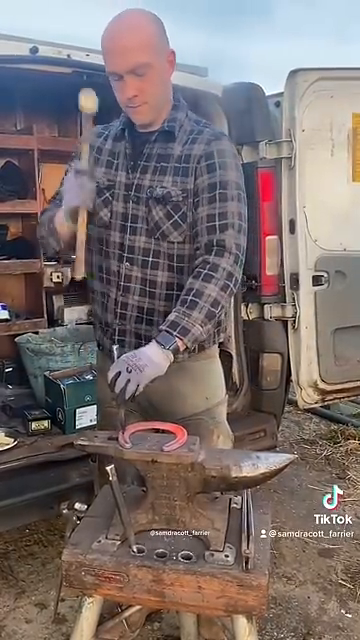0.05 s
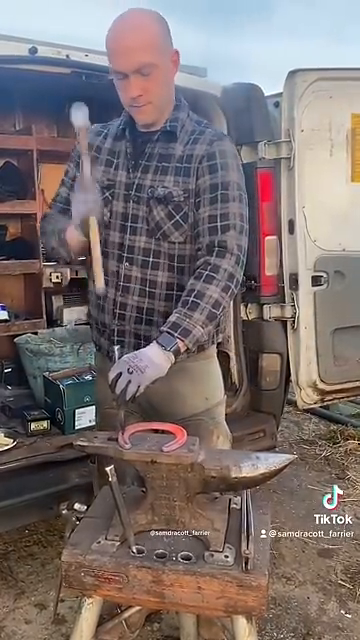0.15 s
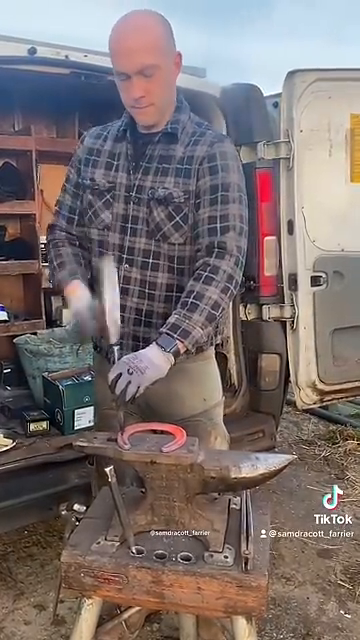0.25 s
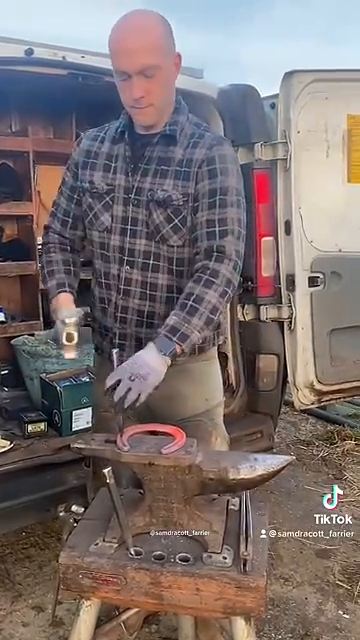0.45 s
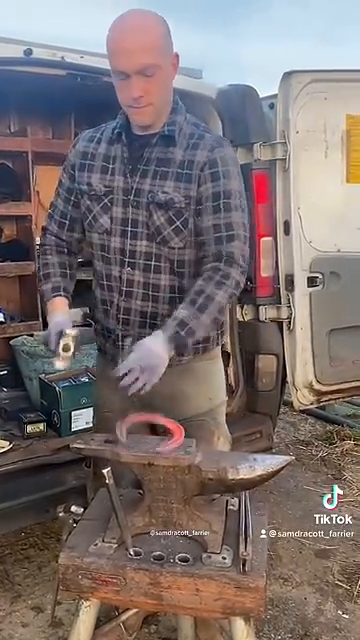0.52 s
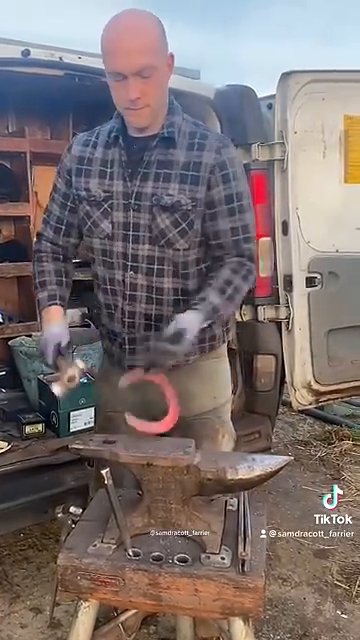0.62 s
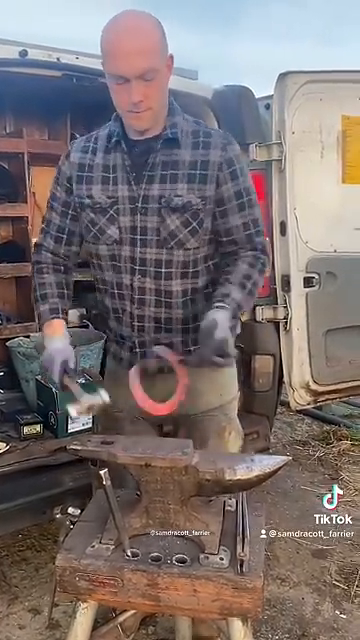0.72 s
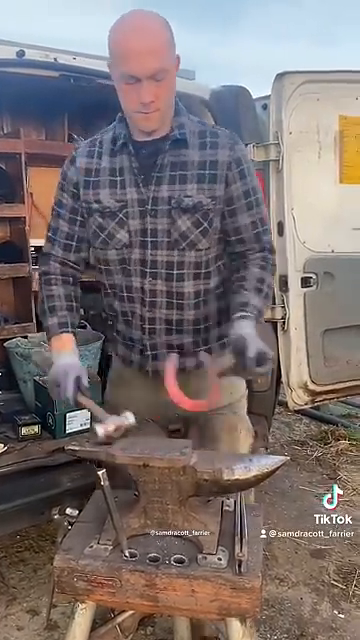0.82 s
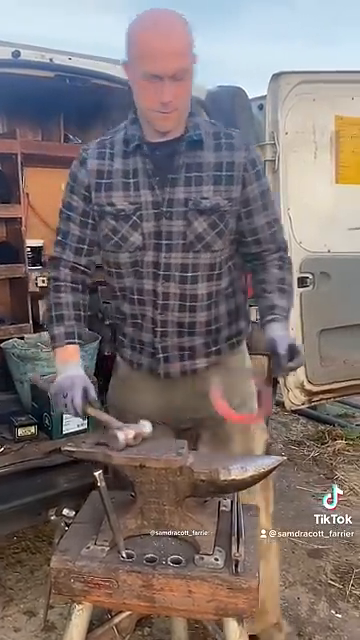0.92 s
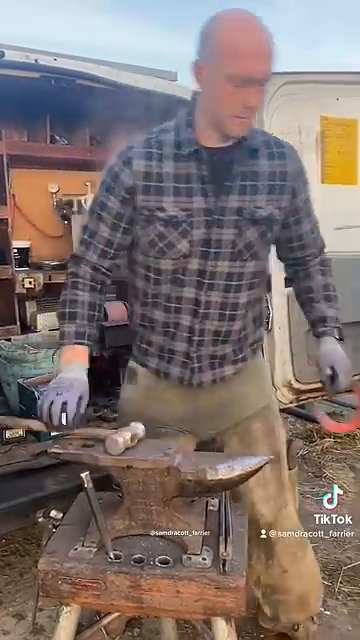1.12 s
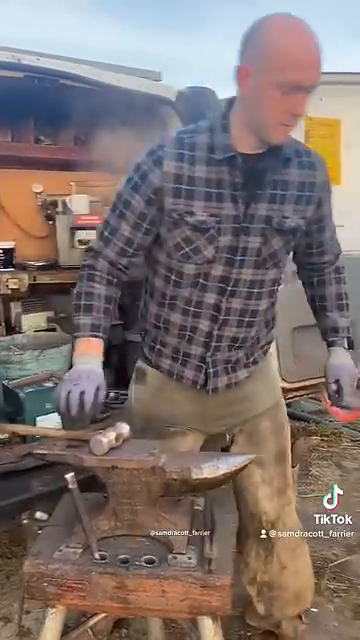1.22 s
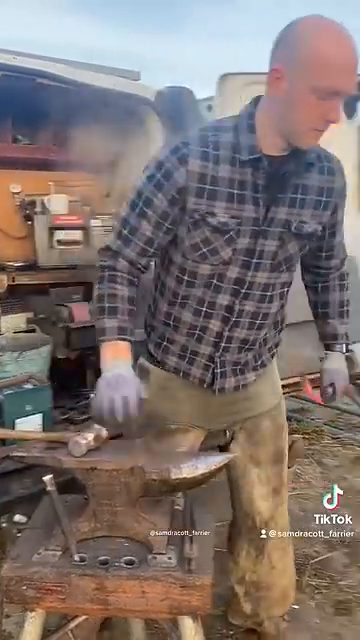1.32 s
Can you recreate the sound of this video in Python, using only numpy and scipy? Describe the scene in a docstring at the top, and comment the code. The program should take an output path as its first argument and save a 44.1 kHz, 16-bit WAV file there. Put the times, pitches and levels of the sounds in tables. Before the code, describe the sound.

Hammer strike on hot horseshoe and anvil: sharp crack, thud and steel ring, then rattling clinks

```python
"""A crack, a thud and a ring of steel: outdoors a hammer drives a punch into a hot horseshoe on an anvil.
The shoe is lifted off and the hammer laid down, rattling on the bare anvil, its wooden handle knocking.
Steel and wood are sums of decaying modes with bursts of band noise; the crack is noise decaying band by band.
Shaped noise makes the low rumble and faint hiss beneath; a gain control dips the level after the blow."""
import sys
import numpy as np
from scipy import signal
from scipy.fft import rfft, irfft
from scipy.io import wavfile
from scipy.ndimage import uniform_filter1d

SR = 44100
rng = np.random.default_rng(int(sys.argv[2]) if len(sys.argv) > 2 else 0)


def dump(signal):
    """Clip the signal to [-1, 1] and save it as 16-bit WAV at the path in sys.argv[1]."""
    limited = np.clip(np.atleast_2d(signal).T, -1, 1)
    pcm = np.round(limited * 32767).astype(np.int16)
    wavfile.write(sys.argv[1], SR, pcm)


N = 59535
T = np.arange(N) / SR

# "t60" is the time in which a sound decays by 60 dB
# Air noise, middle and side (half the left-right difference): (frequency [Hz], relative density [dB per Hz])
AIR_SPECTRUM = [(12, -46), (20, -33.5), (81, 3.5), (155, -10.5), (296, -2), (564, -22), (1300, -29.5),
                (2000, -28.5), (3160, -34), (5720, -34.5), (6730, -43), (7290, -91.5), (9290, -33),
                (12500, -40.5), (16200, -92), (22000, -120)]
AIR_SIDE_SPECTRUM = [(18, -126), (30, -49.5), (871, 3), (1840, -22), (2370, -3.5), (4400, -12), (5410, -38),
                     (5990, -3), (7550, -5), (9280, -8), (10000, -57), (12600, -1.5), (14000, -19)]
AIR_DB, AIR_SIDE_DB = -48.5, -64.5
# Swell of the rumble: (time [s], relative level [dB])
RUMBLE_SWELL = [(0, 0), (.4, -2), (.7, -2), (.8, 0.5), (.88, 4), (.96, 1), (1.1, -3), (1.2, 1), (1.35, -3)]
RUMBLE_TOP_HZ = 350

# Wooden handle modes: (frequency before the pitch factor [Hz], relative level [dB], t60 [s])
HANDLE_MODES = [(234, -14.5, 0.056), (679, -9.5, 0.14), (851, -10.5, 0.042), (1434, -0.5, 0.04),
                (1725, -0.5, 0.099), (2456, -7, 0.064), (2588, 0, 0.034)]
# Handle knocks: (time [s], level [dB], tilt [dB per octave], pitch factor [ratio])
KNOCKS = [(0.7894, -33, 3.5, 0.94), (0.82, -35, 3.5, 0.79), (0.84, -36, 6, 0.99), (.874, -35.5, 2.5, 0.85),
          (.885, -34, 8, .96), (0.899, -33.5, 7.5, .96), (0.91, -35.5, 2, 1.03), (1.035, -26, 1, 1.01),
          (1.069, -37, 0.5, 1.18), (1.078, -39.5, 1, 1.05), (1.099, -43.5, 18, 1.001),
          (1.144, -37, -4, 1.016), (1.178, -40, 7, 0.9), (1.206, -43, -7, 0.98)]
# Dull grain of the wood under each knock, its level relative to the knock
CLUNK_BAND_HZ, CLUNK_DB, CLUNK_T60_S = (614, 3130), -4, 0.048

# Steel on steel; the spot touched sets what each part rings with:
# (time [s], damping [0-1], 6 anvil levels at ANVIL_KNOTS_HZ [dB], 3 head levels at HEAD_KNOTS_HZ [dB],
#  tick level [dB])
CONTACTS = [(0.2171, 0.89, -23, -31.5, -18.5, -20, -18, -26.5, -37.5, -30, -23, -30.5),
            (.790, .01, -29.5, -40, -44, -40, -38.5, -52, -70, -55, -60, -53),
            (.820, 0.0082, -27, -28.5, -28.5, -29, -29, -33.5, -44, -42, -48.5, -49),
            (0.842, 0.0086, -29, -31.5, -27.5, -26.5, -25, -37, -58, -40.5, -49.5, -56),
            (0.875, 0.00333, -29.5, -30.5, -41, -28, -27.5, -37, -37.5, -61.5, -62, -62),
            (0.899, 0.0042, -28, -41.5, -33, -29.5, -26, -35.5, -54, -53, -57, -61),
            (1.036, 0.32, -44, -44, -53, -57, -31.5, -56, -60.5, -67, -69, -65),
            (1.075, 0.126, -32.5, -33, -25, -33.5, -25.5, -38, -40, -47, -37, -37.5),
            (1.1, 0.56, -37, -31, -33, -49.5, -28.5, -36.5, -51, -54, -35, -44),
            (1.146, .3, -43, -37.5, -59.5, -62.5, -35.5, -42, -54, -75, -38.5, -63),
            (1.176, 0.06, -54, -29.5, -32.5, -38.5, -31, -43.5, -40, -59, -43.5, -38),
            (1.255, 0.11, -56, -47.5, -43, -45.5, -38.5, -52.5, -57.5, -72, -52.5, -77)]
# Frequencies at which the contact levels are given: (frequency [Hz])
ANVIL_KNOTS_HZ = [1613, 2930, 3233, 3495, 4492, 4811]
HEAD_KNOTS_HZ = [2353, 5063, 7647]
# Anvil modes: (frequency [Hz], relative level [dB], free t60 [s], damped t60 [s],
#               left-right level [dB], left phase lead [rad])
ANVIL_MODES = [(1610, -3, 1.0, 0.28, -1.22, 0.27), (1832, -20, 0.66, 0.44, -1.5, 0.6),
               (2019, -16.5, 0.32, 0.58, -4, -1.7), (2867, -5, .14, 0.23, 0, 0.97),
               (2923, 1, 0.293, 0.29, -1, 1.62), (3237, -7.5, 0.21, .25, 0, 1.33),
               (3496, 1, 0.426, 0.29, -1.5, 1.5), (4487, -3, 1, 0.17, -14.5, 1.4),
               (4823, -0.5, 0.19, 0.75, -2, 0.3), (5280, -20, 0.41, .3, -8, 1),
               (5787, -7.5, 0.27, 0.35, 2, 2.36), (6900, -9, 0.68, .15, 0.8, 3.5),
               (9080, -22, 0.43, 0.38, -1, 8)]
# Hammer head modes: (frequency [Hz], relative level [dB], t60 [s], left-right level [dB],
#                     left phase lead [rad])
HEAD_MODES = [(1625, -10, 1.217, -.8, 0.53), (2355, -4, 1.48, -1.5, 1), (3664.5, 3, 0.5505, 0.5, 1.66),
              (4490, -18.5, 0.84, -18, 12.33), (4806, -1.5, 0.94, 0, -0.54), (5054, -1, 1.07, 1.5, 0.33),
              (6174, -2.5, 0.63, .3, 4.3), (7640, -8, .7, -0.5, 3.5)]
# Tick of each contact: (frequency before the pitch factor [Hz], relative level [dB], t60 [s])
TICK_MODES = [(11440, 1, 0.057), (8700, -15, 0.01), (6440, -2, 0.022), (3200, 3, 0.01)]
JOLT_DB = 9.5  # a contact that lifts a mode this much gives it a wholly new phase
MUTE_DB_PER_S = 900  # a contact that quiets a mode does so no faster than this
# Broad snap of each contact, its level relative to the tick
SNAP_BAND_HZ, SNAP_DB, SNAP_T60_S = (1500, 12000), -1, 0.012
# The hardest clinks wake the dense small modes too: (time [s], level [dB])
SPRAYS = [(.820, -54.5), (1.076, -68), (1.177, -61.5)]
SPRAY_T60_S = 0.66

BLOW_S = 0.2155
# Rough clang between the modes after the blow
CLANG_BAND_HZ, CLANG_DB, CLANG_T60_S = (2640, 6350), -41, 0.42
# Crack noise, middle and side: (frequency [Hz], relative density [dB per Hz])
CRACK_SPECTRUM = [(240, -49), (400, 9), (769, -33), (1650, -0.5), (2250, -19), (3430, -4.5), (4070, -22),
                  (4900, 1.5), (5910, -15), (6590, -47), (9420, -6), (15000, -25), (16500, -32)]
CRACK_SIDE_SPECTRUM = [(240, -53.5), (400, -30), (1670, -24), (2290, -24), (3220, -10.5), (3940, -16),
                       (4400, -7), (7820, -5), (10700, -13.5), (14300, -11), (16500, -40)]
CRACK_DB, CRACK_SIDE_DB = -17.5, -21.5
# The treble speaks first, the bass follows:
# (top frequency [Hz], lag [s], hold [s], t60 [s], relative level [dB])
CRACK_BANDS = [(2520, 0.0045, 0.0041, .03, 2.5), (6900, .0005, 0.01, 0.018, 2.),
               (12700, 0.00034, 0.0012, 0.022, 6.5), (20000, 0.000098, 0.0047, .012, 8.5)]
# Dense small modes that shimmer after the crack, their level relative to it
SHIMMER_BAND_HZ, SHIMMER_DB, SHIMMER_T60_S = (8760, 12400), -16, 0.46
# Punch modes: (frequency before the pitch factor [Hz], level [dB], t60 [s])
PUNCH_MODES = [(8200, -50, 0.66), (8840, -58.5, .5), (8930, -60, .4), (9100, -44, .4), (10150, -50, 0.3),
               (10730, -44, .55), (10730, -48, 0.13), (10910, -45, 0.64), (11640, -45, .25),
               (12070, -41, 0.484), (13500, -50, 0.42), (9000, -12, 0.014), (14800, -24, .02)]
# Thud modes of the stand: (frequency before the pitch factor [Hz], level [dB], t60 [s])
THUD_MODES = [(205, -18, 0.071), (278, -13.5, 0.052), (519.7, -26, 0.035), (888, -24.5, 0.014),
              (1155, -23.5, 0.027)]
THUD_S = 0.2195

DUCK_OVER_DB, DUCK_S = -24.5, 0.24  # threshold, and the length of one sag and return
DUCK_DB = 13  # the most that the gain can sag
EDGE_HZ = 16950


def amp(db):
    """Decibel law: 20 dB is a factor of ten in amplitude."""
    return 10 ** (np.asarray(db) / 20)


def evened(x):
    """Normalisation to unit root-mean-square level."""
    return x / np.sqrt(np.mean(x ** 2) + 1e-20)


def read(points, hz):
    """Spectral envelope interpolated along logarithmic frequency."""
    f, value = np.transpose(points)
    return np.interp(np.log(hz + 1), np.log(f + 1), value)


def noise(spectrum, size, swell_db=lambda hz, t: 0 * t):
    """Spectral shaping of Gaussian noise by overlapping frames; swell_db(hz, t) adds dB over time."""
    hop = size // 4
    frames = N // hop + 5
    hz = np.fft.rfftfreq(size, 1 / SR)[:, None]
    t = np.arange(frames) * hop / SR
    real, imag = rng.standard_normal((frames, size // 2 + 1, 2)).T
    z = (real + 1j * imag) * amp(read(spectrum, hz) + swell_db(hz, t))
    return signal.istft(z, nperseg=size, noverlap=size - hop)[1][:N]


def puffs(rows, band_hz, t60, rise=0.0017):
    """Exponential decay of band-limited noise, one burst per (time, level) row."""
    band = signal.butter(4, band_hz, "band", fs=SR, output="sos")
    grain = evened(signal.sosfilt(band, rng.standard_normal(N)))
    envelope = 0
    for s, db in rows:
        attack = np.clip((T - s) / rise, 0, 1)
        envelope = envelope + attack * amp(db - 60 * np.maximum(T - s, 0) / t60)
    return grain * envelope


def struck(s, db, modes, tilt_db=0., pitch=0.99):
    """Modal superposition: one knock sums decaying sines of random phase, with a short rise."""
    t = np.maximum(T - s, 0)
    wave = 0
    for (hz, mode_db, t60), turn in zip(modes, rng.random(len(modes))):
        level = db + mode_db + tilt_db * np.log2(hz / 1500) - 60 * t / t60
        wave = wave + amp(level) * np.sin(2 * np.pi * (hz * pitch * t + turn))
    return wave * np.minimum(t / 0.00052, 1)


def ring(modes, knots_hz, levels, damped):
    """Damped modal vibration: each contact resets every mode's level, and it decays from there."""
    starts = np.array([row[0] for row in CONTACTS])
    last = np.clip(np.searchsorted(starts, T) - 1, 0, None)
    age = np.maximum(T - starts[last], 0)
    begun = T > starts[0]
    turns = rng.uniform(-np.pi, np.pi, (len(starts), len(modes)))
    out = np.zeros((2, N))
    for k, (hz, db, t60, damped_t60, pan_db, lead) in enumerate(modes):
        level = np.array([np.interp(hz, knots_hz, row) for row in levels])
        rate = 60 * ((1 - damped) / t60 + damped / damped_t60)  # dB per second
        # the more a contact lifts the mode above its decayed level, the more its phase turns
        lift = np.diff(level, prepend=-99) + np.r_[0, rate[:-1] * np.diff(starts)]
        phase = np.cumsum(turns[:, k] * np.clip(lift / JOLT_DB, 0, 1))
        fall = np.where(begun, db + level[last] - rate[last] * age, -200)
        # limit the steepest fall
        fall = np.maximum.accumulate(fall + MUTE_DB_PER_S * T) - MUTE_DB_PER_S * T
        z = begun * amp(np.minimum(fall, 0)) * np.exp(1j * phase[last])
        # smooth the steps over 2 ms, then set the mode turning
        z = uniform_filter1d(z.real, size=88) + 1j * uniform_filter1d(z.imag, size=88)
        z = z * np.exp(2j * np.pi * hz * T)
        pan = amp([pan_db / 2, -pan_db / 2])
        pan = pan / np.linalg.norm(pan)
        out += 2 * pan[:, None] * np.real([z * np.exp(1j * lead), z])
    return out


def air():
    """Stationary broadband noise for the hiss of the open yard, with a slow swell in its rumble."""
    def swell(hz, t):
        return np.interp(t, *np.transpose(RUMBLE_SWELL)) * (hz < RUMBLE_TOP_HZ)

    mid = amp(AIR_DB) * evened(noise(AIR_SPECTRUM, 2048, swell))
    side = amp(AIR_SIDE_DB) * evened(noise(AIR_SIDE_SPECTRUM, 2048, swell))
    return np.array([mid + side, mid - side])


def handle():
    """Heavily damped wood resonance: each knock sounds short modes and a dull grain of noise."""
    knocks = sum(struck(s, db, HANDLE_MODES, tilt_db, pitch) for s, db, tilt_db, pitch in KNOCKS)
    clunks = puffs([(row[0], row[1] + CLUNK_DB) for row in KNOCKS], CLUNK_BAND_HZ, CLUNK_T60_S)
    wood = knocks + clunks
    return wood + 0.081 * np.roll(wood, -2) * np.array([[1], [-1]])


def rough_steel():
    """High modal density heard as noise: contact snaps, sprays of small modes and the clang of the blow."""
    snaps = puffs([(row[0], row[11] + SNAP_DB) for row in CONTACTS], SNAP_BAND_HZ, SNAP_T60_S)
    sprays = puffs(SPRAYS, SHIMMER_BAND_HZ, SPRAY_T60_S)
    clang = puffs([(BLOW_S, CLANG_DB)], CLANG_BAND_HZ, CLANG_T60_S)
    rough = snaps + sprays + clang
    return np.array([np.roll(rough, shift=-4), rough])  # left leads by 4 samples


def steel():
    """Contact damping: anvil and hammer head ring, the hot shoe or resting hammer damping the anvil."""
    rows = np.array(CONTACTS)
    damped = np.clip(rows[:, 1], 0, 1)
    ticks = sum(struck(row[0], row[11], TICK_MODES) for row in CONTACTS)
    head_modes = [(hz, db, t60, t60, pan_db, lead) for hz, db, t60, pan_db, lead in HEAD_MODES]
    anvil = ring(ANVIL_MODES, ANVIL_KNOTS_HZ, rows[:, 2:8], damped)
    head = ring(head_modes, HEAD_KNOTS_HZ, rows[:, 8:11], 0 * damped)
    return anvil + head + ticks


def crack(spectrum, db):
    """Frequency-dependent decay: each band of noise starts, holds and dies on its own, plus a shimmer."""
    z = rfft(evened(noise(spectrum, 256)))
    hz = np.fft.rfftfreq(N, 1 / SR)
    age = np.maximum(T - BLOW_S, 0)
    shimmer_low_hz, shimmer_top_hz = SHIMMER_BAND_HZ
    shimmer = irfft(z * (hz > shimmer_low_hz) * (hz < shimmer_top_hz), N)
    out = shimmer * (age > 0) * amp(SHIMMER_DB - 60 * age / SHIMMER_T60_S)
    low_hz = 0
    for top_hz, lag, hold, t60, band_db in CRACK_BANDS:
        band = irfft(z * (hz >= low_hz) * (hz < top_hz), N)
        decay = amp(band_db - 60 * np.maximum(age - lag - hold, 0) / t60)
        out = out + band * (age > lag) * decay
        low_hz = top_hz
    return amp(db) * out


def blow():
    """Impact excitation: a dense crack of metal, the ringing punch, then the thud of the stand."""
    thud = struck(THUD_S, 0, THUD_MODES)
    punch = struck(BLOW_S, 0, PUNCH_MODES)
    mid = crack(CRACK_SPECTRUM, CRACK_DB) + thud
    side = crack(CRACK_SIDE_SPECTRUM, CRACK_SIDE_DB) - 0.051 * np.roll(thud, -20)
    return np.array([mid + side + np.roll(punch, shift=-4), mid - side + punch])


def scene():
    """Linear superposition of all the sources."""
    return air() + handle() + rough_steel() + steel() + blow()


def record(dry):
    """Gain control by level detection: loud peaks make the gain sag slowly and return; then a low-pass."""
    power_db = 10 * np.log10(uniform_filter1d((dry ** 2).mean(0), size=200) + 1e-12)
    over = np.maximum(power_db - DUCK_OVER_DB, 0)
    sag = np.sin(np.pi * np.linspace(0, 1, round(DUCK_S * SR))) ** 2
    depth_db = DUCK_DB * np.tanh(over.sum() / (0.05 * SR))  # more excess, deeper sag
    course = signal.fftconvolve(over, sag)[:N] / (over.sum() + 1e-9)
    ducked = dry / amp(depth_db * course)
    low_pass = signal.firwin(511, EDGE_HZ, window=("kaiser", 9), fs=SR)
    return signal.oaconvolve(ducked, low_pass[None], "same")


dry = scene()
out = record(dry)
dump(out)
```